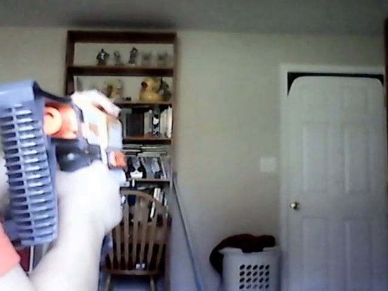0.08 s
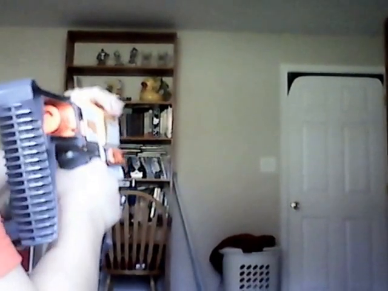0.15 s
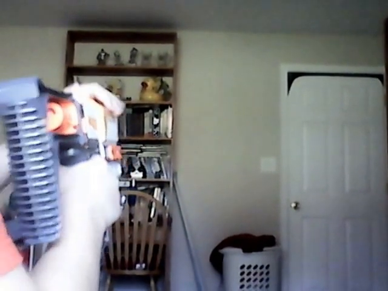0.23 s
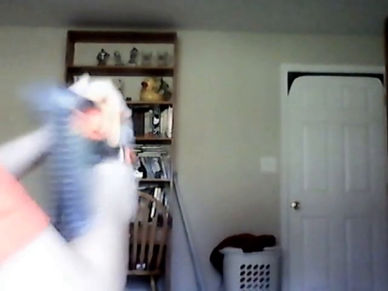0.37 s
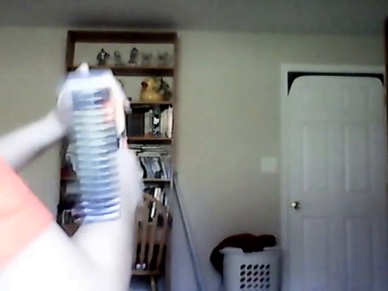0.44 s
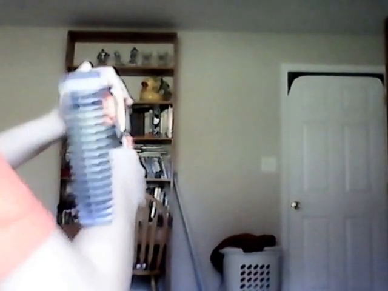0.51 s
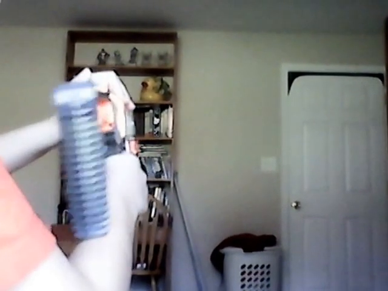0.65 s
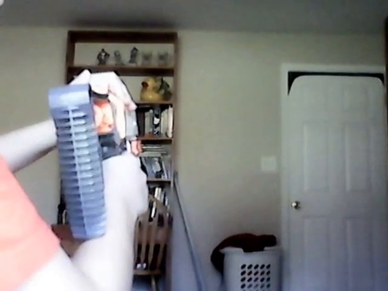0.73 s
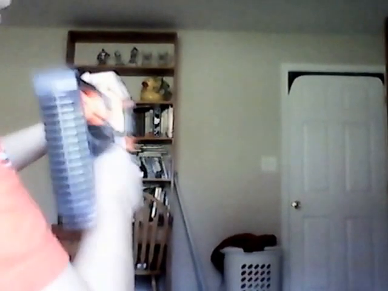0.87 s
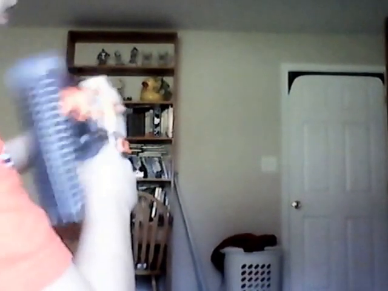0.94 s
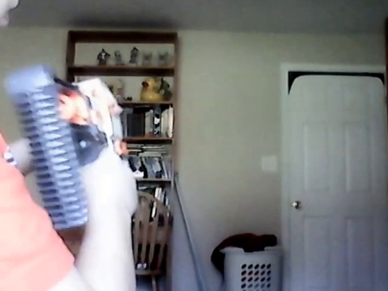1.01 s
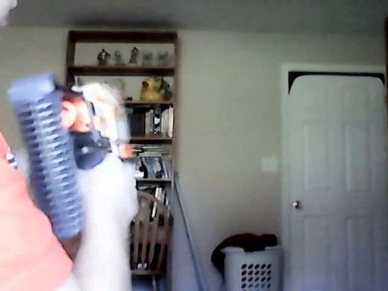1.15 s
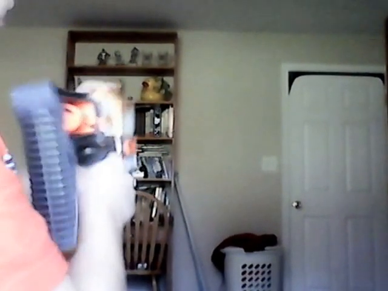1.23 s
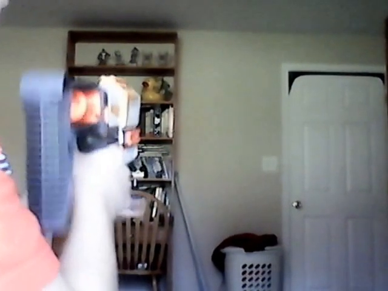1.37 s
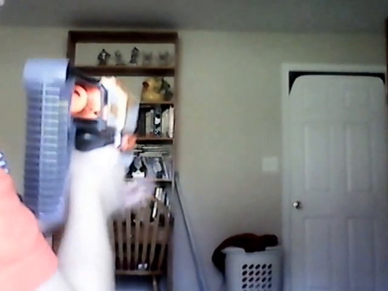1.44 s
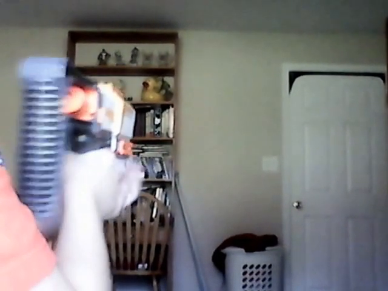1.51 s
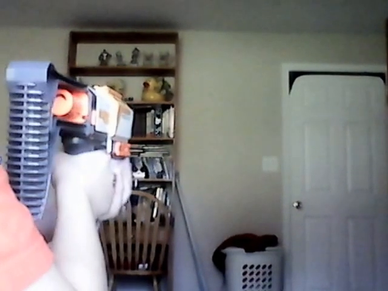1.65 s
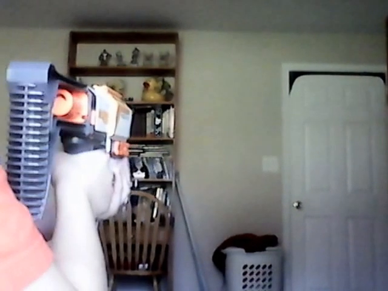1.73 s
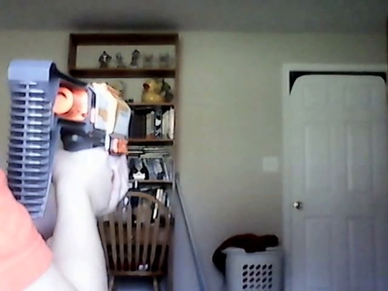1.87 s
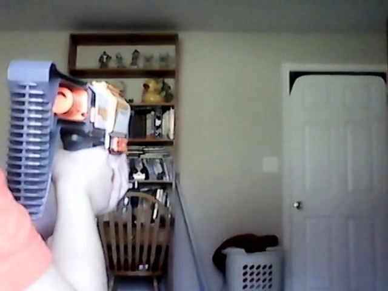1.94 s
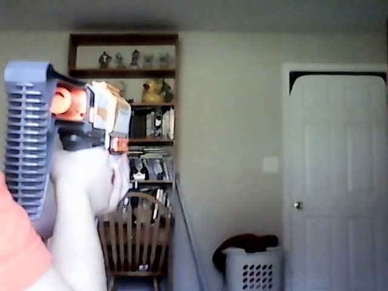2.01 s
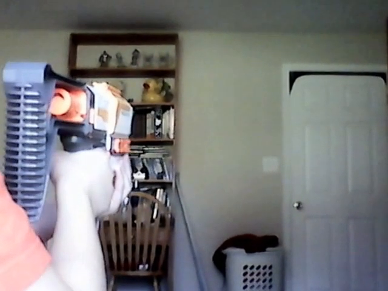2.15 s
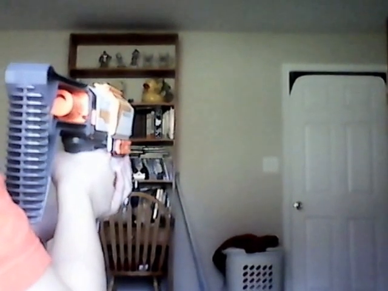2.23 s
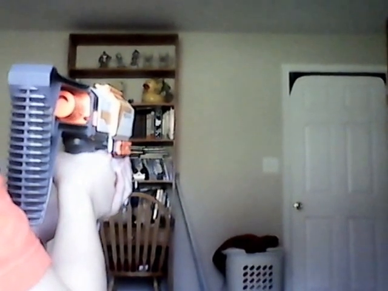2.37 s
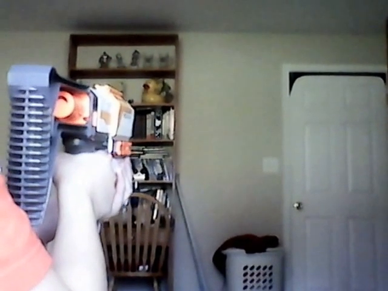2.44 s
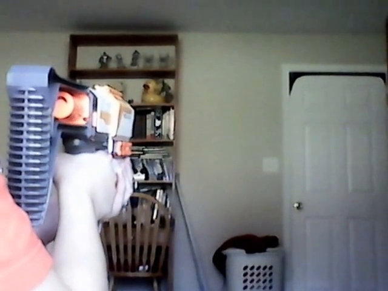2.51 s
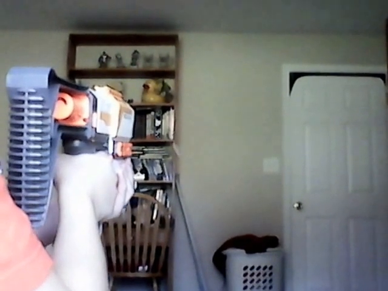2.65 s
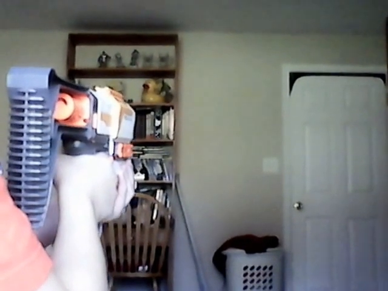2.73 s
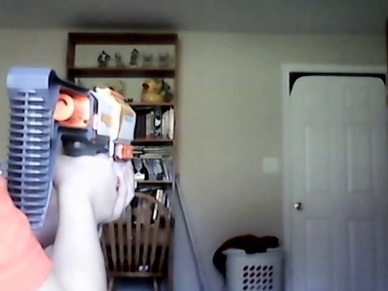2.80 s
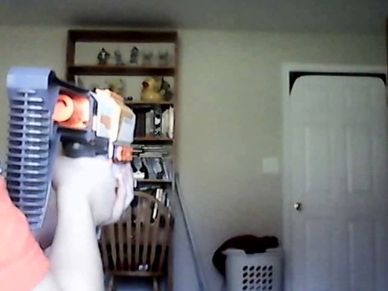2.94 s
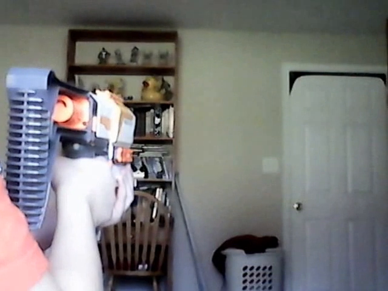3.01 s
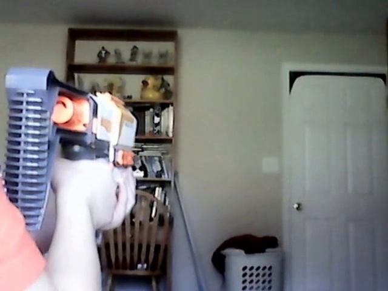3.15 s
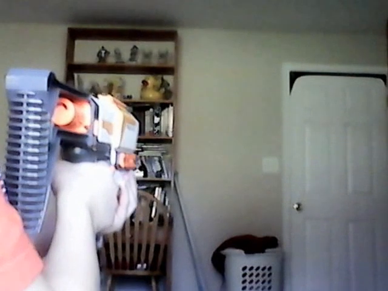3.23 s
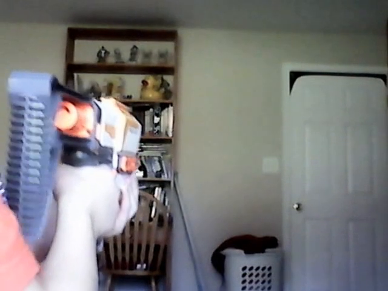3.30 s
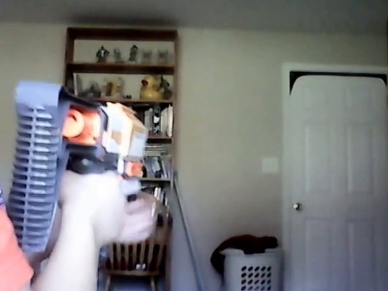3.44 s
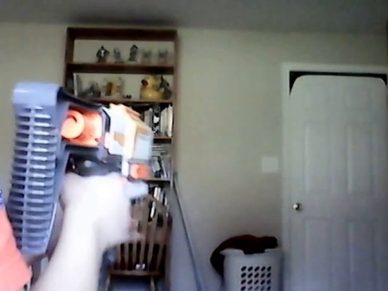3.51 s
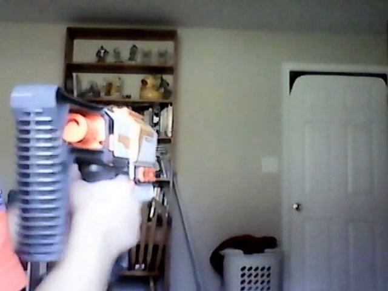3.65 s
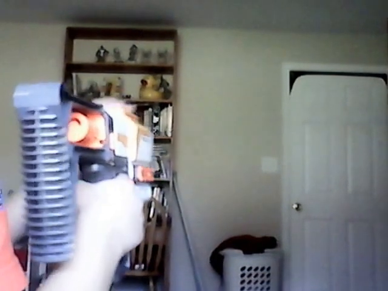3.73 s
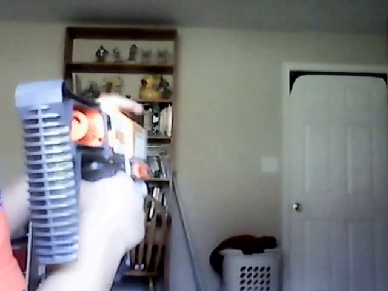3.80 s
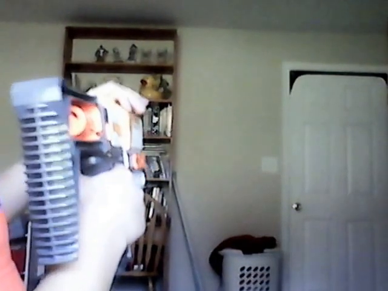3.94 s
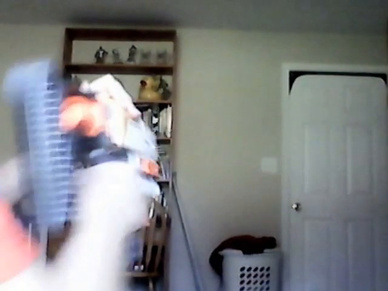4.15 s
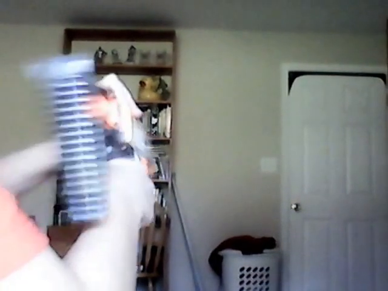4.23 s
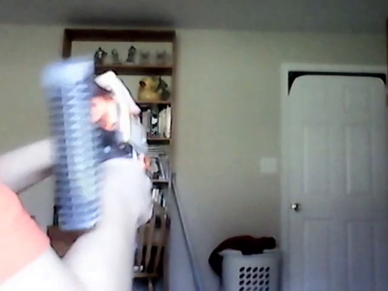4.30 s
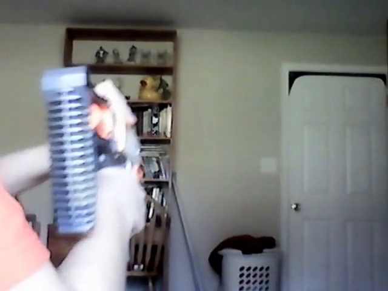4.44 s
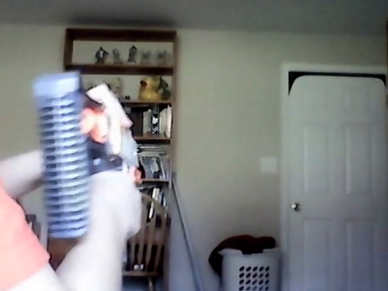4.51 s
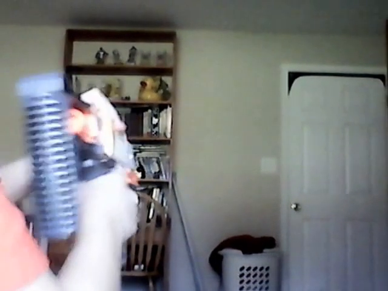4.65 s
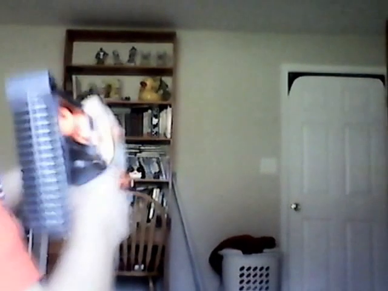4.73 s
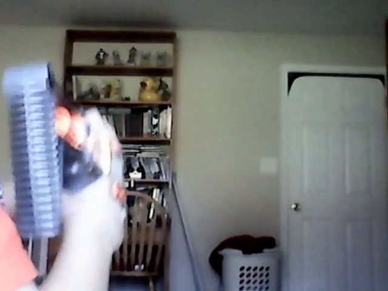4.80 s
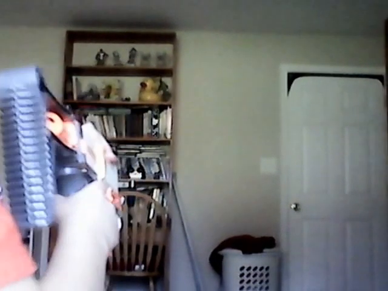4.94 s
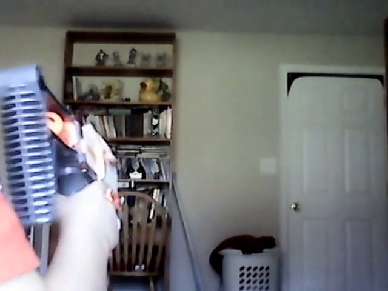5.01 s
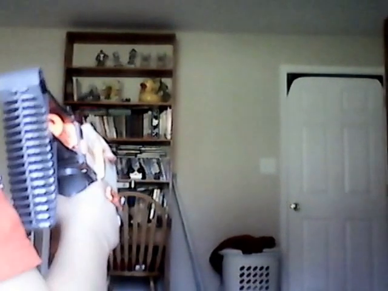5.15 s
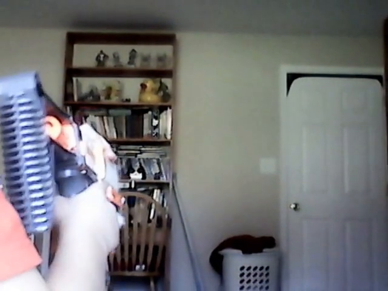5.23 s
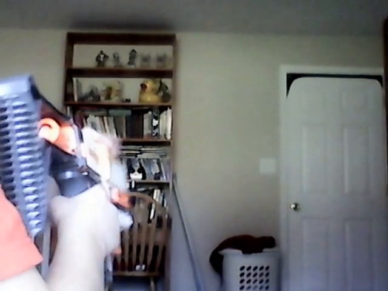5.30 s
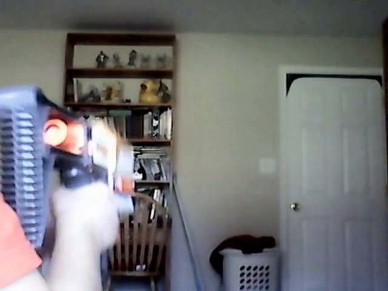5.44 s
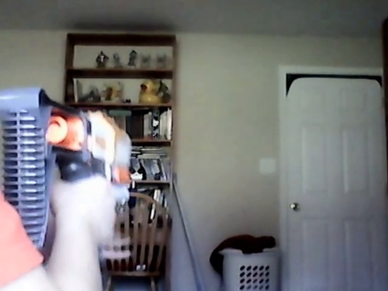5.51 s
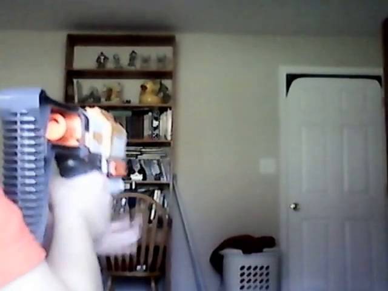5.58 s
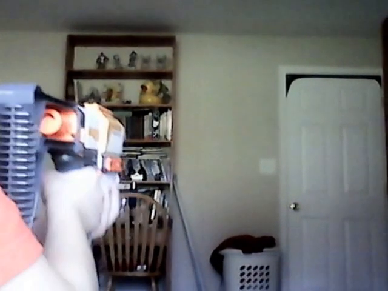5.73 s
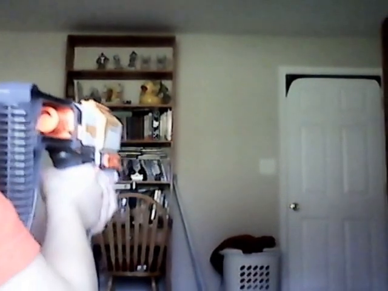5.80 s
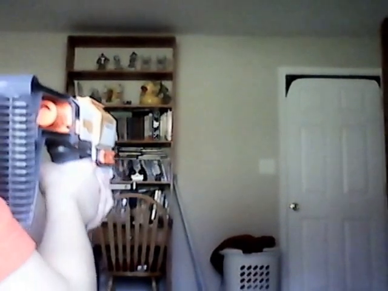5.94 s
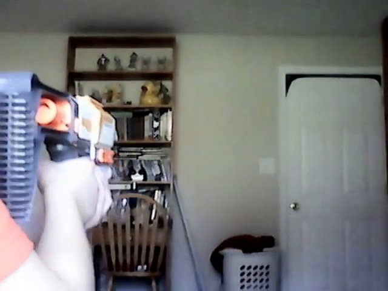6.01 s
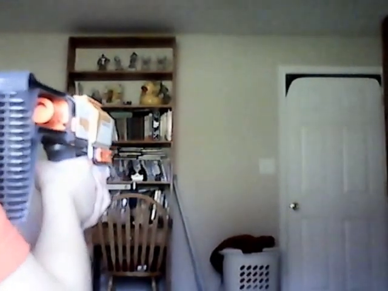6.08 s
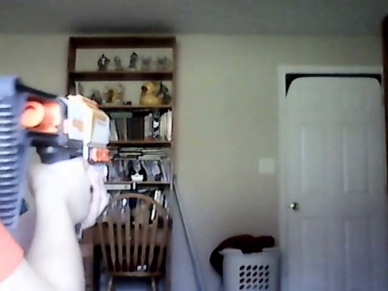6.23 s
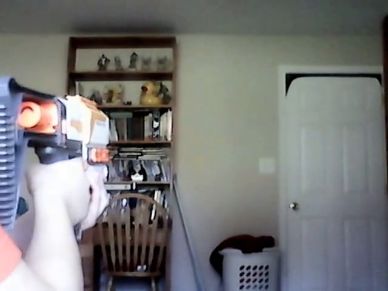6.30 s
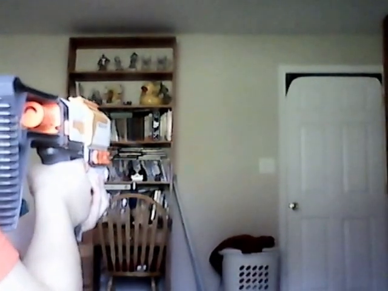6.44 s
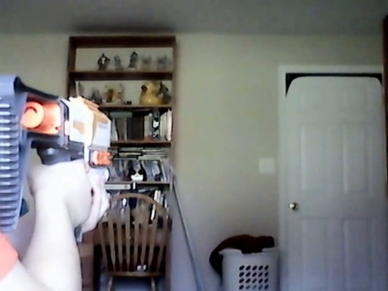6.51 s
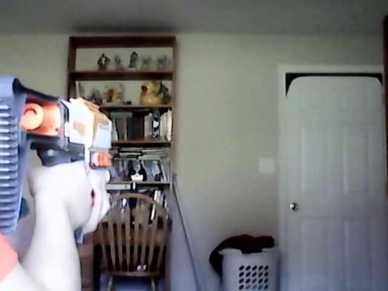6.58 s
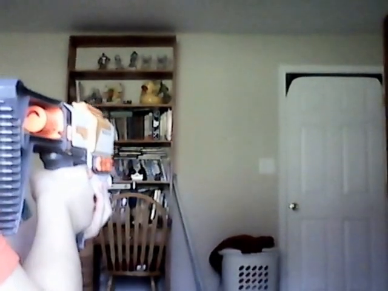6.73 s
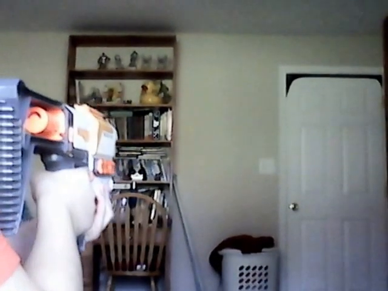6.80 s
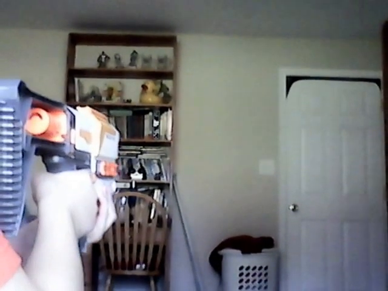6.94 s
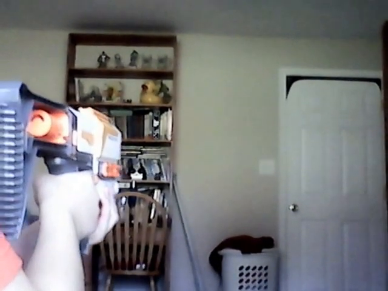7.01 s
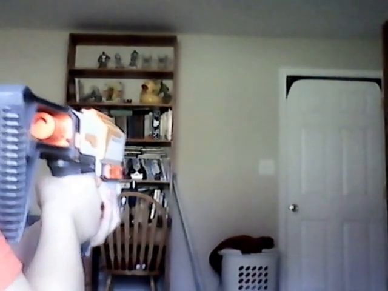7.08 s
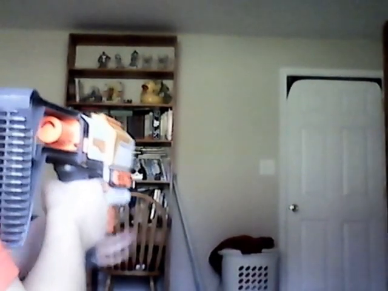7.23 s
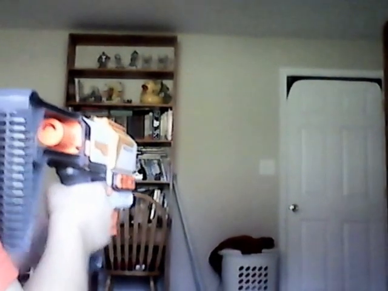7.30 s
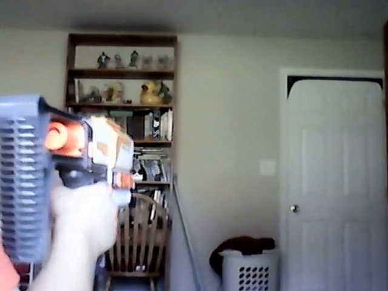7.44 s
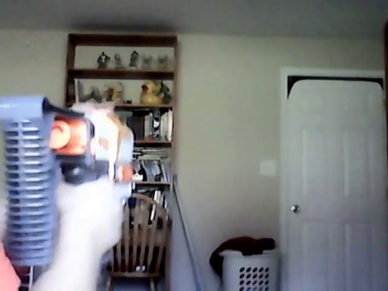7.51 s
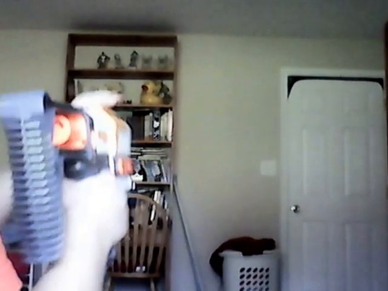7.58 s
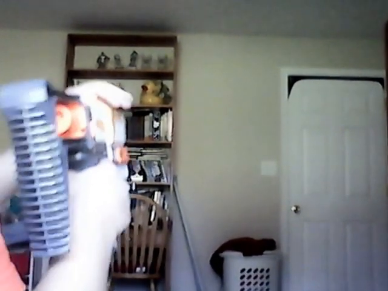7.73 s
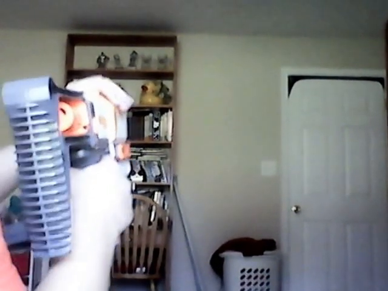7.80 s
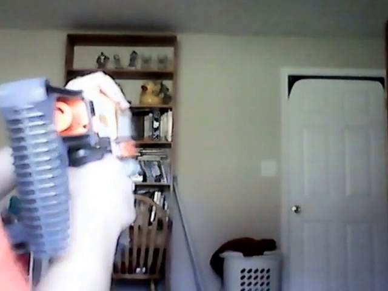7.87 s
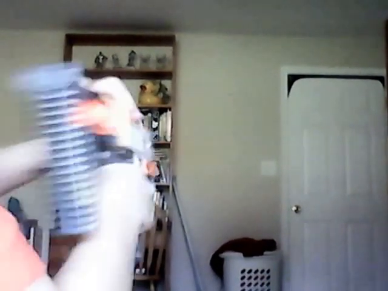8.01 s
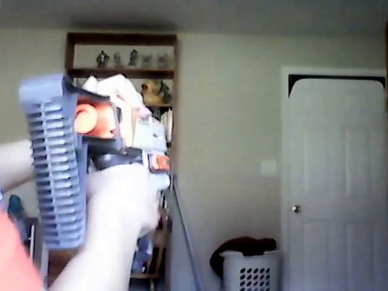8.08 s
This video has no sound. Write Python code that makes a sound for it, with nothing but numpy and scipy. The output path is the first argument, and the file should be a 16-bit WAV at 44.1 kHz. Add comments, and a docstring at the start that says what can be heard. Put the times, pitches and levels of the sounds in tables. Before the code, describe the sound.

Loud plastic slide clacks back and forward, a punchy spring shot snaps, a dart thuds far off; the cycle repeats, ending on another pull.

```python
"""A spring-powered plastic dart blaster is primed and fired close to a microphone in a small room.
Over rumble, hiss and faint hum, taps and a palm rub precede the slide scraping and clacking back, then forward.
Air rushes from the trigger on, the plunger slams home; a moment later the foam dart thumps a door across the room.
After more handling the cycle repeats, and a third pull ends the scene. Contacts are damped modes plus shaped
noise bursts, friction is noise under a hand-speed curve, and each sound gets a random room tail."""
import sys
import numpy as np
from scipy import signal
from scipy.fft import rfft, irfft, next_fast_len
from scipy.io import wavfile
from scipy.ndimage import uniform_filter1d

SR = 44100
rng = np.random.default_rng(int(sys.argv[2]) if len(sys.argv) > 2 else 0)


def to_wav(s):
    """Save 16-bit WAV."""
    ch = np.atleast_2d(s).T  # columns
    pcm = np.round(np.clip(ch, -1, 1) * 32767)  # PCM
    wavfile.write(sys.argv[1], SR, pcm.astype(np.int16))


N = 359415
TOP_HZ = 15700
LENGTH = 16384  # samples per contact
T = np.arange(LENGTH) / SR  # time after a contact, s

# Levels, spectra and mode levels are relative; mode and ring frequencies are nominal.
# Room rumble and microphone hiss: f/Hz, density/dB per Hz
HISS_SPECTRUM = [(12, -42.5), (20, -17.5), (32, -11), (47, -10), (92, -1.5), (191, -8.5), (225, -6.5),
                 (282, -10), (324, -6), (416, -11.5), (614, -11.5), (1770, -25), (5380, -23), (7950, -35),
                 (15500, -44.5)]
HISS_DB = -66.5
# Steady electrical hum: f/Hz, level/dB
HUM_TONES = [(59.2, -78), (823.6, -84.5)]
# Room decay: f/Hz, t60/s
ROOM_DECAY = [(100, 0.61), (300, 0.25), (700, .31), (1100, .4), (2000, 0.34), (4500, .35), (6300, 0.37),
              (8000, 0.19), (13000, 0.23)]

# Ringing shell: f/Hz, level/dB, t60/s
SHELL_MODES = [(401, -5, 0.078), (499, -3, .055), (760, 0.5, 0.045), (1169, 0, 0.024), (1618, -5, 0.043),
               (2445, -7.5, 0.044), (4280, -8.5, 0.021), (5960, -21.5, 0.081), (6480, -21, 0.05)]
# Plastic noise: f/Hz, density/dB per Hz
PLASTIC_SPECTRUM = [(30, -46.5), (70, -27.5), (200, -19.5), (300, -10), (400, -4), (800, 0.5), (1600, -4),
                    (2000, -7), (2500, -10), (3200, -14.5), (4400, -16.5), (6500, -21.5), (8000, -31),
                    (15500, -46)]
# Fingers, trigger and loose parts tapping the shell: t/s, level/dB, strongest ring f/Hz, treble/dB
SHELL_TAPS = [(.16, -27.5, 901, -10.5), (.773, -37.5, 703, -6.5), (.828, -33.5, 1640, -5),
              (.843, -40, 720, 4), (1.393, -30.5, 1370, -11.5), (1.705, -34.5, 620, -50),
              (2.625, -33.5, 1120, -16), (3.921, -30, 1030, -2), (3.98, -35.5, 410, -7),
              (4.14, -43, 498, -9.5), (4.693, -37.5, 1480, 0.5), (5.503, -41.5, 1100, -23),
              (6.24, -45, 1060, -22), (6.482, -49.5, 1204, -12), (7.602, -36, 1290, -6.5),
              (7.614, -26, 1000, -2.5), (7.63, -29.5, 1300, -5.5), (7.738, -35.5, 720, -3.5),
              (7.834, -39, 895, -15.5)]

# Palms shifting on the grip: start t/s, length/s, level/dB, strongest f/Hz
PALM_RUBS = [(0.446, .04, -49.5, 700), (1.34, .17, -43, 514), (3.458, 0.08, -53.5, 331),
             (3.62, .1, -56, 538), (5.457, 0.089, -51.5, 704), (6.549, .06, -56.5, 450),
             (7.331, .06, -53, 218)]
# Skin friction: f/Hz, density/dB per Hz
SKIN_SPECTRUM = [(60, -21), (250, 4), (700, -3), (1400, -12), (3000, -21.5), (8000, -38)]
RUB_FIRMEST = .35  # share of a rub's length at which the palm presses hardest

# Slide pulled back: start t/s, rear stop t/s, slack before start/s, release level/dB, catches level/dB,
# stop level/dB, stop ring f/Hz
SLIDE_PULLS = [(.487, 0.5676, .014, -20, -10, -2.5, 849), (4.276, 4.371, 0.037, -18, -12.5, -6, 993),
               (8.051, 8.133, .027, -18.5, -11, -3.5, 643)]
# Slide pushed home: start t/s, breech shut t/s, slack before start/s, slips level/dB, friction level/dB, slam
# level/dB, slam ring f/Hz, rebound level/dB
SLIDE_PUSHES = [(1.030, 1.0881, .026, -23, -25.5, -4.5, 480, -7.5),
                (4.858, 5.0082, .025, -15, -28.5, -7, 425, -26)]
# Rail friction: scrape lead, then pull peak and end as shares of travel, push peak and end from start
SCRAPE_LEAD_S = .014
PULL_FASTEST, PULL_SLOWED, PULL_FRICTION_DB = .44, .88, -26.5
PUSH_FASTEST_S, PUSH_SLOWED_S = .054, .081
SHUT_SCRAPE_S, SHUT_FRICTION_DB = .015, -30  # each side of shutting

# Play taken up before a stroke: share of slack left, level/dB, strongest ring f/Hz, treble/dB, thud/dB
SLACK_KNOCKS = [(0.99, -37, 1830, -6.5, -3.5), (.55, -29.5, 470, -5.5, -3.5)]
# Slide coming free, pulled: strongest ring f/Hz, treble/dB, thud/dB
PULL_RELEASE_TONE = (670, 5, -5)
# Slide coming free, pushed: strongest ring f/Hz, treble/dB, thud/dB
PUSH_RELEASE_TONE = (810, -7.5, -12.5)
PUSH_RELEASE_DB = -14
# Catches passed going back: share of travel, level/dB, strongest ring f/Hz, treble/dB, thud/dB
BACKWARD_CATCHES = [(.21, 0.5, 680, 1.5, -5.5), (.29, -7, 560, -0.5, -7.5), (.465, 2, 620, 10.5, -4),
                    (0.546, -5, 760, -0.5, -9)]
# Sear rides up, slide hits rear stop and rebounds: t from stop/s, level/dB, treble/dB, thud/dB
REAR_STOP_HITS = [(-.008, -10, 7, -2.5), (0, 0, 6, -2.5), (.0075, -9, 4, -8.5), (.026, -16.5, 0.5, -0.5)]
# Rails sticking and slipping going forward: t from start/s, level/dB, strongest ring f/Hz, treble/dB, thud/dB
FORWARD_SLIPS = [(.021, -2.5, 700, 1, -3), (.037, 1.5, 790, 7, 6.5), (.051, 1, 760, 6, -9.5)]
# Dart pressed into the breech: t from shutting/s, level/dB, strongest ring f/Hz, treble/dB, thud/dB
DART_SEATING = [(-.0215, -12.5, 474, -2.5, 4), (-.0095, -12.5, 559.6, 4.5, -0.5)]
SLAM_TREBLE_DB, SLAM_THUD_DB = -8.5, 3.5
# Shut slide bouncing: t from shutting/s, level/dB, strongest ring f/Hz, treble/dB, thud/dB
SHUT_BOUNCES = [(.009, 0.5, 699, 9, -4), (.015, -1, 586, -5, -3.5)]

# Loose latch clicking as the blaster is turned: t/s, level/dB
LATCH_TIMES = [(0.826, -48), (1.394, -50.5), (4.242, -52.5), (4.692, -47.5), (7.629, -55), (8.026, -49.5)]
# Ringing latch: f/Hz, level/dB, t60/s
LATCH_MODES = [(2390, -0.5, 0.038), (2990, -6, .03), (4180, -9.5, .025)]

# Shots: trigger t/s, plunger impact t/s, level/dB, strongest ring f/Hz, upper ring f/Hz, thump/dB,
# rebound delay/s, rebound level/dB
SHOT_EVENTS = [(2.7793, 2.788, -7.5, 743, 1700, -1, 0.0027, -8.5),
               (6.607, 6.617, -6.5, 572, 1591, 0, .0055, -9.5)]
# Ringing plunger: f/Hz, level/dB, t60/s
PLUNGER_MODES = [(80.1, -25.5, .1), (388, -7, 0.048), (557, -9.5, .04), (715, -7, 0.035), (945, -5.5, 0.04),
                 (1400, -13.5, .03), (1610, -16, .045), (1680, -17, .055), (2455, -15.5, 0.034),
                 (4270, -22.5, .03)]
# Air burst: f/Hz, density/dB per Hz
AIR_SPECTRUM = [(30, -32), (60, -10.5), (110, -7.5), (200, -13.5), (400, 3.5), (1000, -0.5), (1600, -5.5),
                (2100, -12.5), (4500, -21), (6500, -25.5), (8000, -37.5), (15500, -49.5)]

# Darts on the door: t/s, level/dB, panel boom/dB, treble/dB
DART_HITS = [(3.036, -15.5, 5, -5.5), (6.9401, -19.5, -1.5, 1.5)]
# Ringing door: f/Hz, level/dB, t60/s
DOOR_MODES = [(161, -13, 0.064), (314, -7.5, 0.024), (470, -12, 0.012), (680, -9, 0.077),
              (820, -7.5, 0.032), (1085, -23, 0.34)]
# Foam slap: f/Hz, density/dB per Hz
FOAM_SPECTRUM = [(40, -32), (80, -12.5), (170, -10.5), (450, -2), (900, -1.5), (1300, -7), (2100, -17.5),
                 (2600, -17), (3600, -18.5), (5200, -31), (6600, -29.5), (8500, -47), (10500, -43.5),
                 (12000, -58)]


def amp(db):
    """Decibels to gain."""
    return 10 ** (np.asarray(db) / 20)


def unit(x):
    """Scale to rms 1."""
    return x / np.sqrt(np.mean(x ** 2) + 1e-20)


def blow(x):
    """Scale to the energy of 5 ms at rms 1."""
    return x / np.linalg.norm(x) * np.sqrt(SR * .005)


def along(points, hz):
    """Interpolate (Hz, value) points on a log frequency axis."""
    point_hz, values = np.transpose(points)
    return np.interp(np.log(hz + 1), np.log(point_hz + 1), values)


def near(hz, centre_hz, octaves):
    """Bell of height 1 around a frequency."""
    return np.exp(-.5 * (np.log2((hz + 1) / centre_hz) / octaves) ** 2)


def coloured(x, db_of):
    """Causal minimum-phase filter, gain in dB a function of frequency."""
    size = 2 * next_fast_len(len(x))
    gain = amp(db_of(np.fft.rfftfreq(size, 1 / SR)))
    cepstrum = irfft(np.log(gain))
    cepstrum[1:size // 2] *= 2  # fold onto positive time
    cepstrum[size // 2 + 1:] = 0
    response = np.exp(rfft(cepstrum))
    return irfft(rfft(x, size) * response)[:len(x)]


def decay(t60_s):
    """Exponential envelope falling 60 dB in t60_s."""
    return amp(-60 * T / t60_s)


def puff(envelope, spectrum):
    """Enveloped noise; its broad colour is the spectrum, only its fine grain is chance."""
    burst = envelope * rng.standard_normal(LENGTH)
    raw_power = np.abs(rfft(burst, 2 * LENGTH)) ** 2
    power = np.abs(uniform_filter1d(raw_power, size=200)) + 1e-12
    return blow(coloured(burst, lambda hz: along(spectrum, hz) - 10 * np.log10(power)))


def ring(modes, scatter_db, detune):
    """Damped modes of alternating sign, level and pitch a little different at every blow."""
    chance = rng.standard_normal((len(modes), 2))
    total = np.zeros(LENGTH)
    for k, (hz, db, t60_s) in enumerate(modes):
        level = (-1) ** k * amp(db + scatter_db * chance[k, 0])
        mode_hz = hz * (1 + detune * chance[k, 1])
        total += level * decay(t60_s) * np.sin(2 * np.pi * mode_hz * T)
    return blow(total)


def in_room(x, wet_db):
    """Direct sound plus a new random diffuse tail for each sound."""
    hz, frame_s, cells = signal.stft(rng.standard_normal(LENGTH), SR, nperseg=256)
    fade = amp(-60 * frame_s / along(ROOM_DECAY, hz)[:, None])
    tail = signal.istft(cells * fade, SR, nperseg=256)[1]
    tail = tail * (1 - np.exp(-T / 0.0018)) * (1 + 1.4 * np.exp(-T / 0.031))  # near walls answer first
    # Treble radiates sideways and arrives mostly by way of the walls.
    direct = coloured(x, lambda hz: along([(1500, 0), (4000, -4), (9000, -6)], hz))
    reverb = signal.fftconvolve(x, tail / np.linalg.norm(tail))[:LENGTH]
    return direct + amp(wet_db) * reverb


def add(track, t_s, sound):
    """Mix a sound in at a time."""
    part = track[round(t_s * SR):][:len(sound)]
    part += sound[:len(part)]


def background():
    """Room rumble and microphone hiss as coloured noise, faint electrical hum as sines."""
    hiss = coloured(rng.standard_normal(N),
                    lambda hz: along(HISS_SPECTRUM, hz) + along([(30, -9.5), (55, -3.0)], hz))
    time_s = np.arange(N) / SR
    hum = sum(amp(db) * unit(np.sin(2 * np.pi * hz * time_s)) for hz, db in HUM_TONES)
    return amp(HISS_DB) * unit(hiss) + amp(1.0) * hum


def shell_hit(ring_hz, treble_db, thud_db, focus_db, focus_octaves, crack_db, crack_t60_s):
    """A contact cracks and rings the shell; spot favours modes, hardness sets treble, weight bass."""
    crack = puff(decay(crack_t60_s), PLASTIC_SPECTRUM)
    hit = ring(SHELL_MODES, scatter_db=2.5, detune=.03) + amp(crack_db) * crack
    hit = hit * (1 - np.exp(-T / 0.0015))  # plastic yields before it pushes back
    tone = [(250, thud_db), (400, 0.0066), (1000, 0.003), (3200, treble_db)]
    return blow(coloured(hit, lambda hz: focus_db * near(hz, ring_hz, focus_octaves) + along(tone, hz)))


def taps():
    """Light touches wake mainly one region of the shell."""
    out = np.zeros(N)
    for t_s, db, ring_hz, treble_db in SHELL_TAPS:
        hit = shell_hit(ring_hz, treble_db, thud_db=-1.0, focus_db=6.0, focus_octaves=0.24,
                        crack_db=-1.0, crack_t60_s=0.024)
        hit = coloured(hit, lambda hz: along([(5000, 1), (9000, -7)], hz))  # a soft contact is dull
        add(out, t_s, amp(db - 11) * in_room(hit, wet_db=0.5))
    return out


def stroke(start_s, fastest_s, end_s):
    """Speed of a hand movement that builds up, slows and stops."""
    now_s = start_s + T
    return np.interp(now_s, [start_s, fastest_s, end_s], [0, 1, .45]) * (now_s < end_s)


def rubs():
    """Skin drags softly over the hollow grip, which favours one band."""
    out = np.zeros(N)
    for start_s, length_s, db, ring_hz in PALM_RUBS:
        speed = stroke(start_s, start_s + RUB_FIRMEST * length_s, start_s + length_s)
        rub = coloured(puff(speed, SKIN_SPECTRUM), lambda hz: 10 * near(hz, ring_hz, octaves=.5))
        add(out, start_s, amp(db) * in_room(blow(rub), wet_db=-5.5))
    return out


def scrapes():
    """Rail friction spans: pulls follow travel, pushes last a set time and rub again as they shut."""
    spans = []  # start/s, fastest/s, end/s, friction level/dB
    for start_s, stop_s, *_ in SLIDE_PULLS:
        travel_s = stop_s - start_s
        spans.append((start_s - SCRAPE_LEAD_S, start_s + PULL_FASTEST * travel_s,
                      start_s + PULL_SLOWED * travel_s, PULL_FRICTION_DB))
    for start_s, shut_s, _, _, friction_db, *_ in SLIDE_PUSHES:
        spans.append((start_s - SCRAPE_LEAD_S, start_s + PUSH_FASTEST_S,
                      start_s + PUSH_SLOWED_S, friction_db))
        spans.append((shut_s - SHUT_SCRAPE_S, shut_s, shut_s + SHUT_SCRAPE_S, SHUT_FRICTION_DB))
    return spans


def slide():
    """Plastic rails stick and slip, hardest where the slide moves fastest, and the shell resounds."""
    out = np.zeros(N)
    for start_s, fastest_s, end_s, db in scrapes():
        slips = (rng.random(LENGTH) < 1500 / SR) * rng.random(LENGTH)  # about 1500 per s
        friction = stroke(start_s, fastest_s, end_s) * (slips + .06)
        shell = ring(SHELL_MODES, scatter_db=2.0, detune=0.01)
        hollow = blow(signal.fftconvolve(friction * rng.standard_normal(LENGTH), shell)[:LENGTH])
        scrape = hollow + puff(friction, PLASTIC_SPECTRUM)
        scrape = coloured(scrape, lambda hz: along([(1000, 2.5), (4000, 7)], hz))
        add(out, start_s, amp(db + 6) * in_room(blow(scrape), wet_db=-8.5))
    return out


def pull_contacts():
    """Going back, the slide comes free, trips over its catches and bangs into the rear stop."""
    hits = []
    for start_s, stop_s, slack_s, release_db, catches_db, stop_db, ring_hz in SLIDE_PULLS:
        travel_s = stop_s - start_s
        hits += [(start_s - share * slack_s, *hit) for share, *hit in SLACK_KNOCKS]
        hits += [(start_s, release_db, *PULL_RELEASE_TONE)]
        hits += [(start_s + share * travel_s, catches_db + db, *tone)
                 for share, db, *tone in BACKWARD_CATCHES]
        hits += [(stop_s + after_s, stop_db + db, ring_hz, *tone)
                 for after_s, db, *tone in REAR_STOP_HITS]
    return hits


def push_contacts():
    """Going forward, the slide comes free, sticks and slips on its rails, seats a dart, slams shut and bounces."""
    hits = []
    for start_s, shut_s, slack_s, catches_db, _, slam_db, ring_hz, rebound_db in SLIDE_PUSHES:
        hits += [(start_s - share * slack_s, *hit) for share, *hit in SLACK_KNOCKS]
        hits += [(start_s, PUSH_RELEASE_DB, *PUSH_RELEASE_TONE)]
        hits += [(start_s + after_s, catches_db + db, *tone) for after_s, db, *tone in FORWARD_SLIPS]
        hits += [(shut_s + after_s, *hit) for after_s, *hit in DART_SEATING]
        hits += [(shut_s, slam_db, ring_hz, SLAM_TREBLE_DB, SLAM_THUD_DB)]
        hits += [(shut_s + after_s, rebound_db + db, *tone) for after_s, db, *tone in SHUT_BOUNCES]
    return hits


def clacks():
    """The slide's jolts, catches and stops crack and ring the shell."""
    out = np.zeros(N)
    for t_s, db, ring_hz, treble_db, thud_db in pull_contacts() + push_contacts():
        hit = shell_hit(ring_hz, treble_db, thud_db, focus_db=4.5, focus_octaves=0.31,
                        crack_db=1.5, crack_t60_s=0.033)
        add(out, t_s, amp(db - 10.0) * in_room(hit, wet_db=-5.0))
    return out


def latch():
    """A small stiff catch snaps against its seat and rings briefly."""
    out = np.zeros(N)
    for t_s, db in LATCH_TIMES:
        snap = puff(decay(.008), PLASTIC_SPECTRUM)
        snap = coloured(snap, lambda hz: along([(800, -15), (2500, -1)], hz))
        click = ring(LATCH_MODES, scatter_db=4.5, detune=0.015) + amp(-6.0) * blow(snap)
        add(out, t_s, amp(db) * in_room(blow(click), wet_db=-3.0))
    return out


def shots():
    """Air rushes from the trigger on, then the plunger slams home with a blast and rebounds."""
    out = np.zeros(N)
    for trigger_s, impact_s, db, ring_hz, upper_hz, thump_db, delay_s, rebound_db in SHOT_EVENTS:
        rush = puff(decay(.12) * (T < impact_s - trigger_s), PLASTIC_SPECTRUM)
        rush = blow(coloured(rush, lambda hz: along([(100, 18.0), (400, 3), (900, 1), (4000, 8)], hz)))
        add(out, trigger_s, amp(db - 18.5) * in_room(rush, wet_db=1))

        slam = ring(PLUNGER_MODES, scatter_db=-2, detune=0.0092) * (1 - np.exp(-T / .001))
        # The grip damps the barrel differently each time and leaves two modes standing out.
        slam = coloured(slam, lambda hz: 6 * near(hz, ring_hz, octaves=.15)
                        + 5 * near(hz, upper_hz, octaves=.06))
        slam = coloured(slam, lambda hz: along([(45, -23.5), (75, thump_db), (300, -0.5)], hz))
        add(out, impact_s, amp(db) * in_room(blow(slam), wet_db=-8.5))

        blast = puff(decay(0.062), AIR_SPECTRUM)
        add(out, impact_s, amp(db - 10.5) * in_room(blast, wet_db=-0.5))
        rebound = puff(decay(0.015), AIR_SPECTRUM)
        add(out, impact_s + delay_s, amp(db + rebound_db) * in_room(rebound, wet_db=-3.5))
    return out


def darts():
    """Foam slaps the far door and its panels boom; mostly the room's answer arrives."""
    out = np.zeros(N)
    for t_s, db, boom_db, treble_db in DART_HITS:
        slap = puff(decay(0.035), FOAM_SPECTRUM)
        hit = amp(-6) * ring(DOOR_MODES, scatter_db=7.5, detune=0.0044) + slap
        tone = [(200, boom_db), (600, 0.0017), (1500, 0.0048), (9000, treble_db)]
        hit = coloured(hit, lambda hz: along(tone, hz))
        add(out, t_s, amp(db - 13.5) * in_room(hit, wet_db=12))
    return out


def scene():
    """Handling, priming, shots and darts over the quiet room, as one channel."""
    handling = taps() + rubs() + latch()
    priming = slide() + clacks()
    firing = shots() + darts()
    return (background() + handling + priming + firing)[None]


def record(dry):
    """The microphone clips at full scale, then keeps nothing from TOP_HZ up."""
    size = next_fast_len(N + LENGTH)
    keep = np.fft.rfftfreq(size, 1 / SR) < TOP_HZ
    return irfft(rfft(np.clip(dry, -1, 1), size) * keep, size)[:, :N]


dry = scene()
out = record(dry)
to_wav(out)
```